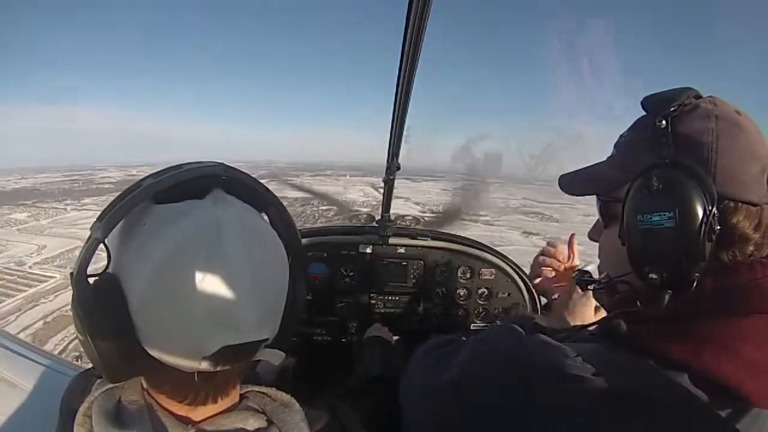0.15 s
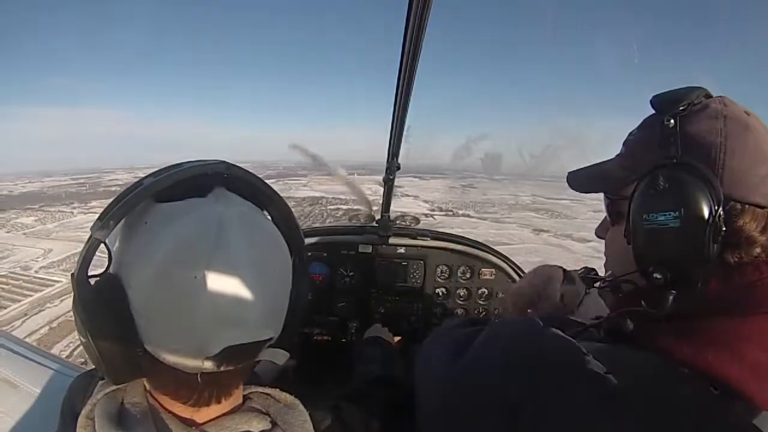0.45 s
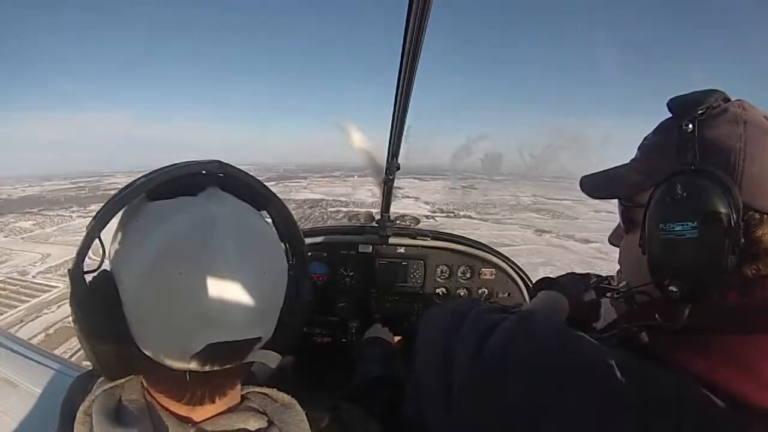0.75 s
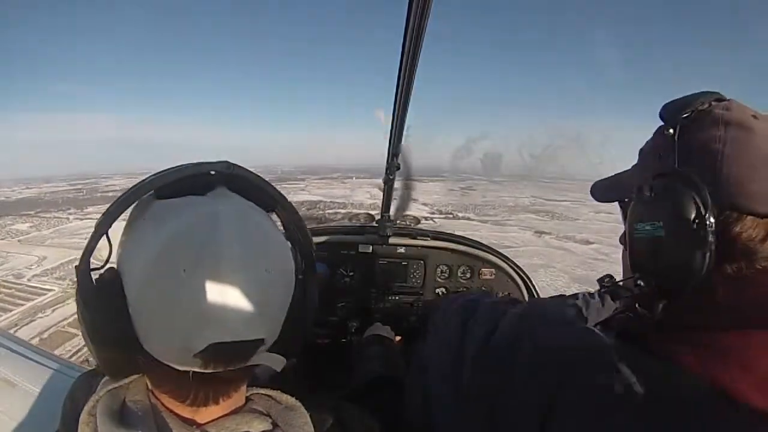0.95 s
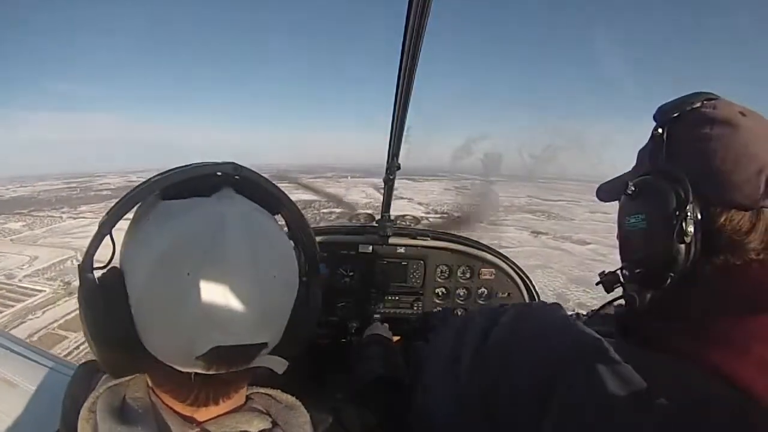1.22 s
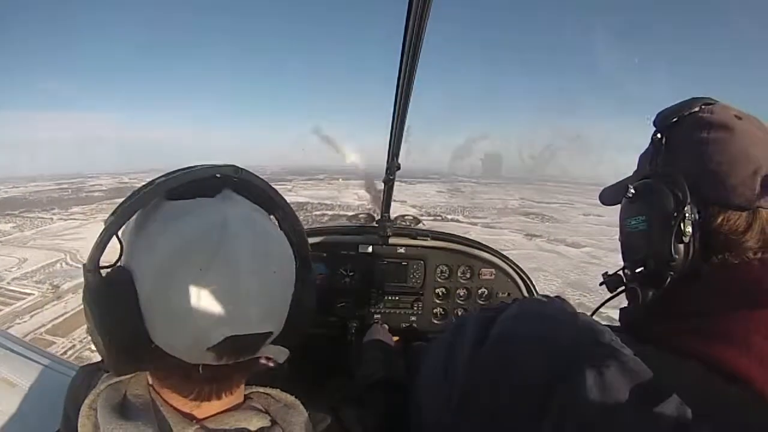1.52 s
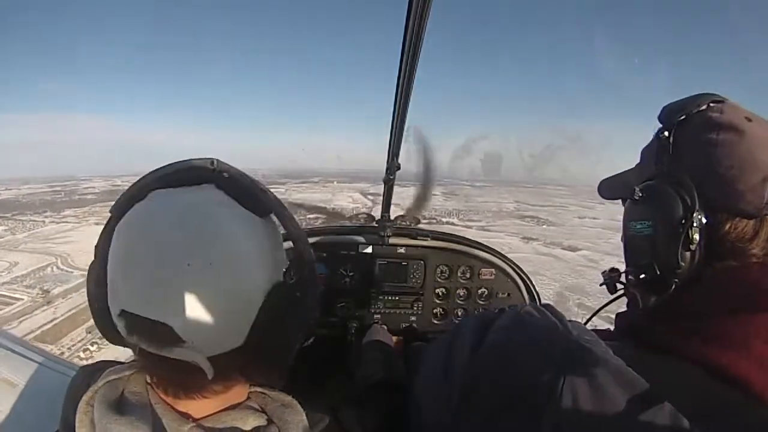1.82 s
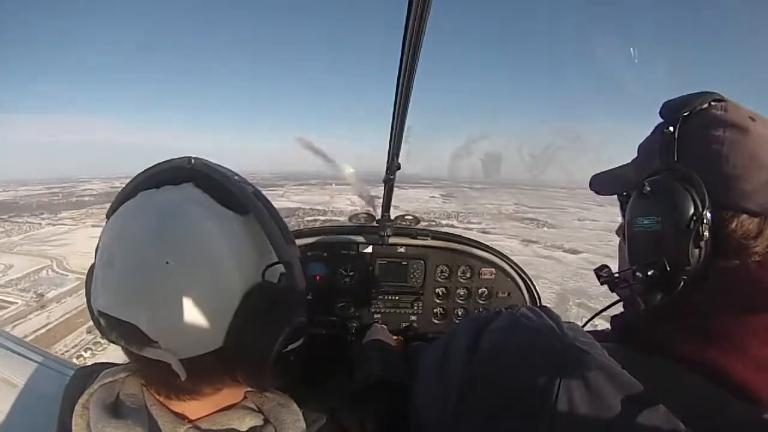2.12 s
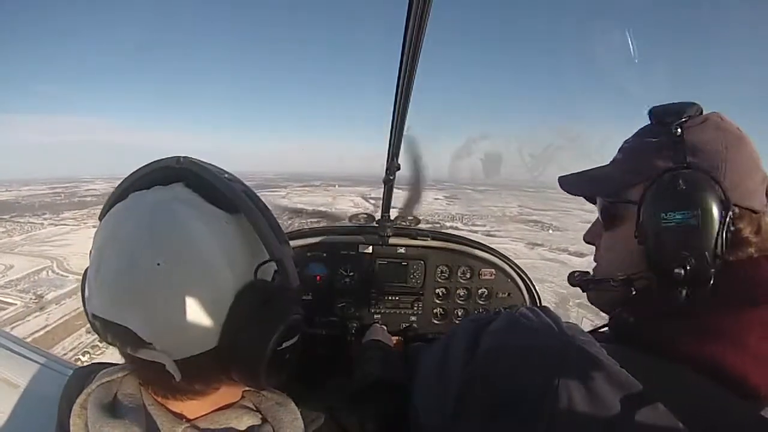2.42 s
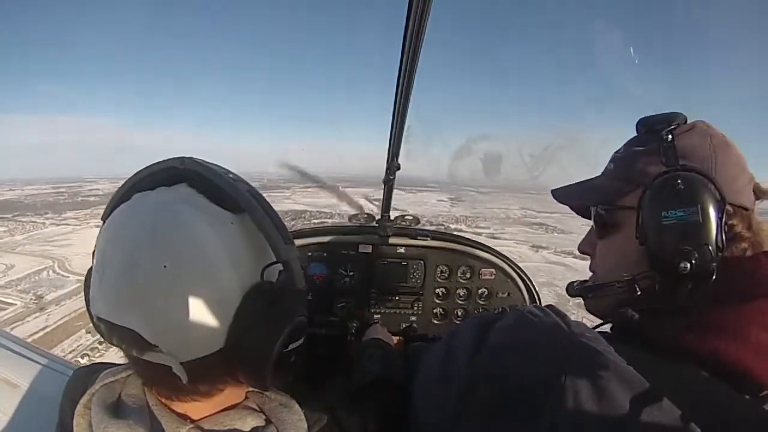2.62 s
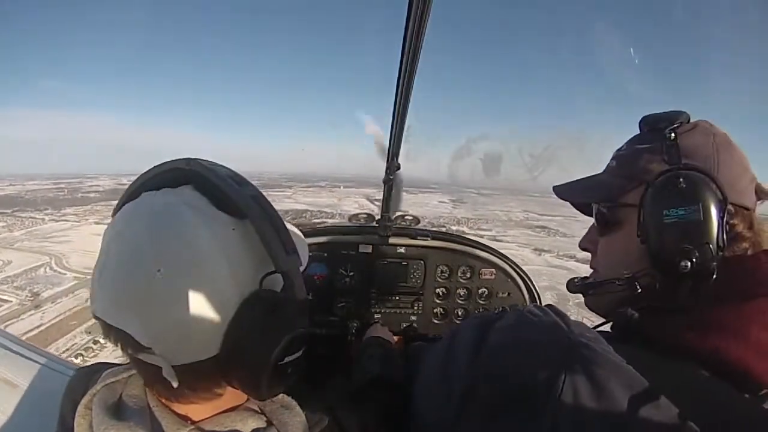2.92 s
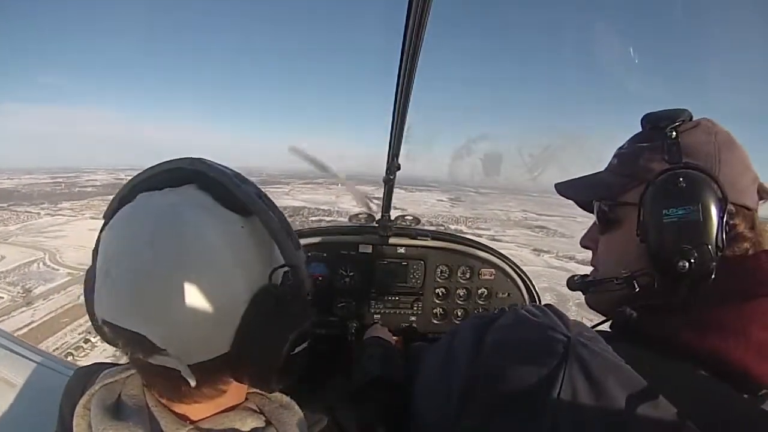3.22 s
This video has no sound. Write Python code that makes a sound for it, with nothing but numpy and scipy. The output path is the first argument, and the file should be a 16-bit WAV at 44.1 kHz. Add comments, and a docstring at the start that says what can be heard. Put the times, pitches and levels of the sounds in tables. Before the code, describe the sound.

A small propeller aircraft drones continuously in cruise, heard inside its cockpit from close behind the seats; deep fluttering cabin boom dominates, with steady wind rush and faint hiss over the canopy.

```python
"""Light aircraft cockpit in cruise.

Buffeting air booms in the cabin, over airframe rumble and panel roar: shaped noise with swelling levels.
The slipstream rushes over the canopy and hisses at its seals: noise pulsing slightly at the blade rate.
A piston engine turns a three-blade propeller through a reduction gear: two beating families of sines.
The gears add a faint whine: one high sine."""
import sys
import numpy as np
from scipy import signal
from scipy.fft import rfft, irfft, next_fast_len
from scipy.io import wavfile
from scipy.ndimage import uniform_filter1d, map_coordinates

SR = 44100
rng = np.random.default_rng(int(sys.argv[2]) if len(sys.argv) > 2 else 0)


def store_wav(level_fs):
    """Save 16-bit WAV to argv[1]."""
    pcm = np.round(np.clip(np.atleast_2d(level_fs), -1, 1) * 32767)
    wavfile.write(sys.argv[1], SR, pcm.T.astype(np.int16))


N = 147735


def amp(db):
    """Decibels to gain."""
    return 10 ** (np.asarray(db) / 20)


def unit(x):
    """Scale to rms 1."""
    return x / np.sqrt(np.mean(x ** 2) + 1e-20)


def curve(rows):
    """One value per sample, interpolated from (time [s], value) rows."""
    times_s, values = np.transpose(rows)
    return np.interp(np.arange(N) / SR, times_s, values)


def wobble(knots_per_s):
    """Smooth random curve through normally distributed knots."""
    knots = rng.standard_normal(int(N * knots_per_s / SR) + 4)
    return map_coordinates(knots, [np.arange(N) * knots_per_s / SR])


def noise(gain):
    """Noise of rms 1 shaped by a gain that depends on frequency."""
    m = next_fast_len(N + 8192)
    spectrum = rfft(rng.standard_normal(m))
    shaped = spectrum * gain(np.fft.rfftfreq(m, 1 / SR))
    return unit(irfft(shaped, m)[:N])


def rush(points):
    """Noise with a (frequency [Hz], gain [dB]) colour, cut to -120 dB above its last point."""
    points_hz, points_db = np.transpose(points)

    def gain(hz):
        return amp(np.interp(np.log(hz + 1), np.log(points_hz + 1), points_db, right=-120))
    return noise(gain)


# airframe rumble colour: (frequency [Hz], relative gain [dB])
RUMBLE_COLOUR = [(10, -26.5), (16, -7.5), (19.5, 11.5), (24, -7.5), (30, -2.5), (45, -1), (65, 3), (110, 1),
                 (165, 6), (197, -2.5), (230, -2.5), (295, -8), (312, -14.5), (350, -17), (500, -57.5)]
RUMBLE_DB = -25


def airframe_rumble():
    """Steady low noise of the airframe."""
    return amp(RUMBLE_DB) * rush(RUMBLE_COLOUR)


# panel roar level before trim: (time [s], level [dB])
PANEL_LEVEL = [(0.0, -36), (0.34, -35.5), (0.56, -46), (0.84, -35), (0.96, -37), (1.44, -30.5), (1.7, -32),
               (2.06, -38), (2.82, -38.5), (3.34, -31)]
# panel roar colour: (frequency [Hz], relative gain [dB])
PANEL_COLOUR = [(250, -24), (345, -1.5), (395, 1.5), (445, -1.5), (465, -12), (482, -1), (510, -16.5),
                (600, -30)]
PANEL_TRIM_DB = -1


def panel_roar():
    """Mid-low noise of the panels, swelling and fading."""
    return amp(curve(PANEL_LEVEL) + PANEL_TRIM_DB) * rush(PANEL_COLOUR)


def resonance(centre_hz, width_hz, hold_s):
    """Turbulence ringing in one cabin resonance, its level evened out over hold_s."""
    def gain(hz):
        detuning = (hz * hz - centre_hz * centre_hz) / (hz * width_hz + 1)
        return 1 / (1 + detuning ** 2)
    ringing = noise(gain)
    envelope = np.abs(signal.hilbert(ringing))
    power = uniform_filter1d(envelope ** 2, max(int(hold_s * SR), 1))
    return unit(ringing / np.sqrt(np.abs(power) + 1e-6))


# lowest resonance level before trim: (time [s], level [dB])
LOW_BOOM = [(0.0, -35), (0.12, -21.5), (0.2, -30.5), (0.24, -18), (0.66, -16.5), (0.74, -19.5),
            (0.82, -13.5), (1.12, -28), (1.2, -12), (1.32, -14), (1.52, -29), (1.58, -29), (1.68, -13),
            (1.78, -23.0), (1.98, -12), (2.14, -25), (2.24, -14.5), (2.38, -15.5), (2.44, -13), (2.48, -17),
            (2.88, -19.5), (3.08, -9), (3.12, -18), (3.34, -15)]
# second resonance level before trim: (time [s], level [dB])
MAIN_BOOM = [(0.0, -8), (0.14, -27), (0.22, -8), (0.54, -14), (0.62, -12), (0.72, -12), (0.76, -19),
             (0.92, -11), (1.08, -21.7), (1.18, -23.5), (1.24, -10.5), (1.3, -15.6), (1.62, -10),
             (1.68, -20.5), (1.72, -11.5), (1.86, -18.5), (2.0, -9.5), (2.16, -19.5), (2.26, -11),
             (2.5, -22.5), (2.56, -7), (2.66, -9.5), (2.72, -30.5), (2.84, -15.5), (2.88, -14.5),
             (3.06, -14.5), (3.12, -20.5), (3.34, -14.5)]
LOW_HZ, LOW_WIDTH_HZ, LOW_TRIM_DB = 89, 28, -4.5
MAIN_HZ, MAIN_WIDTH_HZ, MAIN_TRIM_DB = 137, 15.8, -1.5
UPPER_HZ, UPPER_WIDTH_HZ, UPPER_DB = 262.5, 57.4, -26.5


def cabin_boom():
    """Buffeting rings three cabin resonances; the lower two swell, the upper holds its level."""
    low = amp(curve(LOW_BOOM) + LOW_TRIM_DB) * resonance(LOW_HZ, LOW_WIDTH_HZ, hold_s=0.092)
    main = amp(curve(MAIN_BOOM) + MAIN_TRIM_DB) * resonance(MAIN_HZ, MAIN_WIDTH_HZ, hold_s=0.045)
    upper = amp(UPPER_DB) * resonance(UPPER_HZ, UPPER_WIDTH_HZ, hold_s=0.29)
    return low + main + upper


# canopy rush level before trim: (time [s], level [dB])
CANOPY_LEVEL = [(0.0, -34.0), (0.32, -33.5), (0.52, -36.5), (0.82, -35.1), (1.56, -32), (1.72, -33.5),
                (1.96, -32.0), (2.06, -35), (2.48, -33.1), (2.72, -36), (2.94, -34), (3.34, -33)]
# canopy rush colour: (frequency [Hz], relative gain [dB])
CANOPY_COLOUR = [(400, -30), (520, -11.5), (585, -10.5), (630, -9.5), (690, -4.5), (765, -6), (810, -17),
                 (910, -19.5), (1000, -15), (1110, -10), (1170, -9), (1225, -21), (1275, -3), (1540, -3.5),
                 (1675, -5), (1740, 1), (1800, 1), (1900, -7), (2050, -14), (2200, -10), (2350, -9),
                 (2780, -17.5), (2950, -30.5), (3400, -42)]
CANOPY_TRIM_DB = 0.5


def canopy_rush():
    """Air over the canopy: mid-band noise with a slightly unsteady level."""
    level_db = curve(CANOPY_LEVEL) + CANOPY_TRIM_DB + 0.27 * wobble(25)
    return amp(level_db) * rush(CANOPY_COLOUR)


# seal hiss level before trim: (time [s], level [dB])
SEAL_LEVEL = [(0.0, -49.5), (0.36, -51.5), (0.58, -54), (0.88, -51.6), (0.98, -52), (1.22, -49.1),
              (1.38, -50), (1.98, -49.5), (2.04, -51.5), (2.56, -50), (2.66, -53), (2.96, -50.8),
              (3.34, -50.5)]
# seal hiss colour: (frequency [Hz], relative gain [dB])
SEAL_COLOUR = [(2000, -15.5), (2950, -2), (3250, -5), (3450, 3.5), (3600, -1.5), (3950, -1), (4110, 2),
               (4550, -7.5), (5080, -1.5), (5550, -4), (5800, -8), (6450, -8.5), (6850, -4), (7300, -10.5),
               (7700, -9.5), (8500, -16), (9100, -14.5), (10300, -20), (11000, -19), (13000, -26),
               (14500, -31), (15700, -37.5)]
SEAL_TRIM_DB = 0.5


def seal_hiss():
    """Air at the canopy seals: treble noise with a slightly unsteady level."""
    level_db = curve(SEAL_LEVEL) + SEAL_TRIM_DB + 0.24 * wobble(15)
    return amp(level_db) * rush(SEAL_COLOUR)


BLADES = 3
BLADE_PULSE_DEPTH = 0.063  # fraction of amplitude


def slipstream(shaft_turns):
    """Canopy rush and seal hiss, pulsing with each passing blade."""
    pulse = 1 + BLADE_PULSE_DEPTH * np.cos(2 * np.pi * BLADES * shaft_turns)
    return (canopy_rush() + seal_hiss()) * pulse


BOOM_REACH_HZ, BOOM_FOLLOW = 25, 0.41  # tones this near a resonance share this part of its swells


def swell_db(tone_hz):
    """How far a tone near one of the two low cabin resonances rises and falls with it."""
    total_db = 0
    for centre_hz, level_db in [(LOW_HZ, curve(LOW_BOOM)), (MAIN_HZ, curve(MAIN_BOOM))]:
        nearness = np.exp(-((tone_hz - centre_hz) / BOOM_REACH_HZ) ** 2)
        total_db = total_db + nearness * (level_db - level_db.mean())
    return BOOM_FOLLOW * total_db


def tone(cycles, rms_db, waver_db, drift_rad, knots_per_s):
    """One shaft tone whose level and phase waver about their nominal course."""
    phase = 2 * np.pi * (cycles + rng.random()) + drift_rad * wobble(knots_per_s)
    mean_hz = cycles[-1] * SR / N
    level_db = rms_db + swell_db(mean_hz) + waver_db * wobble(knots_per_s)
    return np.sqrt(2) * amp(level_db) * np.sin(phase)


# propeller tones: (multiple of propeller shaft speed [1], nominal rms level [dB])
PROP_TONES = [(3, -21.5), (4, -54.5), (6, -37), (8, -36), (9, -31), (14, -49.5)]


def propeller(shaft_turns):
    """Shaft-multiple tones made unsteady by uneven air, phase drift growing with order."""
    return sum(tone(np.round(order) * shaft_turns, db, waver_db=3.3,
                    drift_rad=0.23 * order / BLADES, knots_per_s=9)
               for order, db in PROP_TONES)


WHINE_ORDER, WHINE_DB = 41.98, -63  # order in crankshaft turns


def gear_whine(crank_turns):
    """Reduction gears: one thin tone locked to the crankshaft."""
    return tone(WHINE_ORDER * crank_turns, WHINE_DB, waver_db=1.5, drift_rad=1.0, knots_per_s=20)


# engine tones: (multiple of crankshaft speed [1], nominal rms level [dB])
ENGINE_TONES = [(1, -38.5), (1.5, -33.5), (2, -24.5), (2.5, -39), (3, -55.5), (3.5, -35.5), (4, -53.5),
                (4.5, -34), (5.5, -49.5), (6, -49.5), (6.5, -49.5), (7.5, -64), (8, -55), (9, -54.5),
                (9.5, -48.5), (10, -54), (11, -62), (11.5, -58), (14.5, -57), (21, -56.5)]


def engine(crank_turns):
    """The firing pattern repeats every two turns, so tones lie on half multiples."""
    return sum(tone(np.round(2 * order) / 2 * crank_turns, db, waver_db=2.13,
                    drift_rad=0.29, knots_per_s=7)
               for order, db in ENGINE_TONES)


# crankshaft speed: (time [s], speed [turns/s])
CRANK_SPEED = [(0, 73.65), (.95, 73.5), (1.35, 73.65), (1.6, 73.93), (2.6, 74.1), (3.35, 74.3)]
GEAR_RATIO = 51 / 21  # crankshaft turns per propeller turn


def scene():
    """One crankshaft drives engine, gears and propeller, amid cabin and slipstream noise."""
    crank_turns = np.cumsum(curve(CRANK_SPEED)) / SR
    shaft_turns = crank_turns / GEAR_RATIO
    cabin = airframe_rumble() + panel_roar() + cabin_boom()
    air = slipstream(shaft_turns)
    machinery = propeller(shaft_turns) + gear_whine(crank_turns) + engine(crank_turns)
    return (cabin + air + machinery)[None]


TOP_HZ = 15720


def record(dry):
    """Ease in and out over about 5 ms each; keep nothing at or above TOP_HZ."""
    eased = dry * signal.windows.tukey(N, .003)
    m = next_fast_len(N + SR // 2)
    passband = np.fft.rfftfreq(m, 1 / SR) < TOP_HZ
    return irfft(rfft(eased, m) * passband, m)[..., :N]


dry = scene()
out = record(dry)
store_wav(out)
```